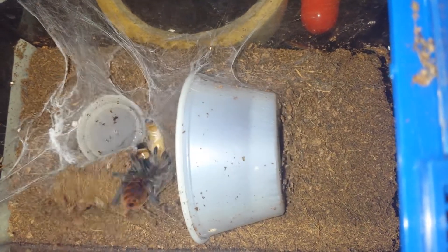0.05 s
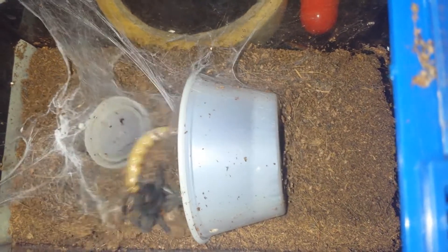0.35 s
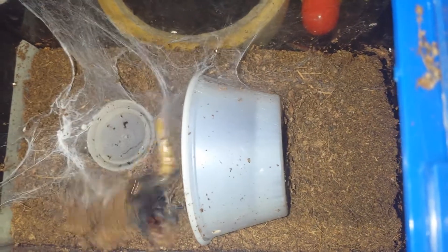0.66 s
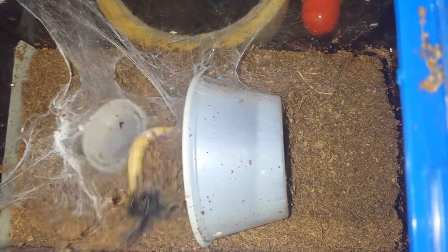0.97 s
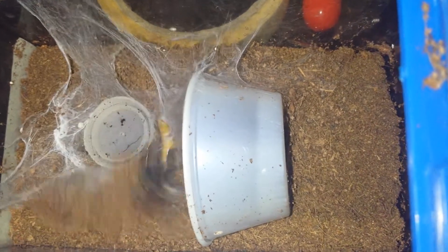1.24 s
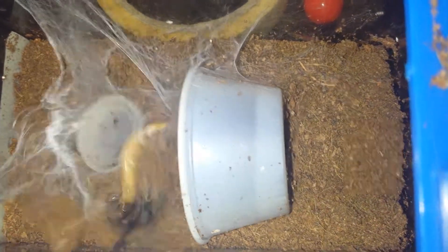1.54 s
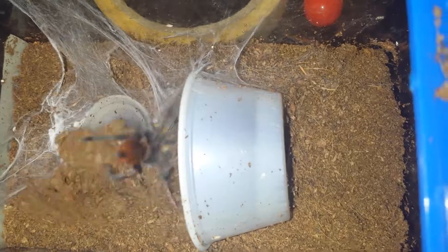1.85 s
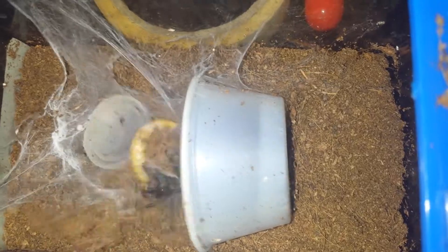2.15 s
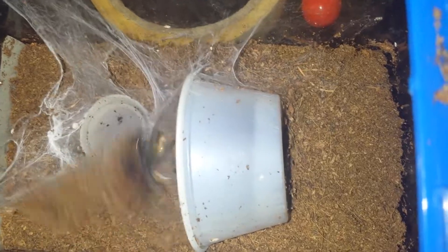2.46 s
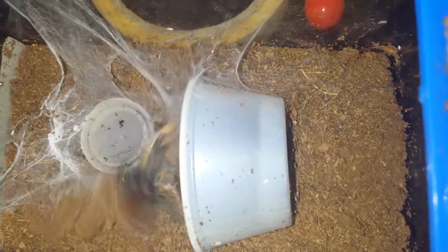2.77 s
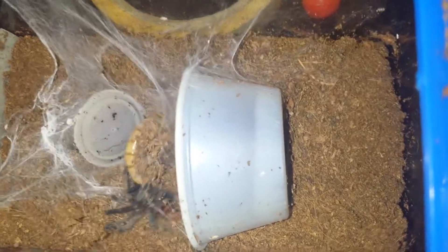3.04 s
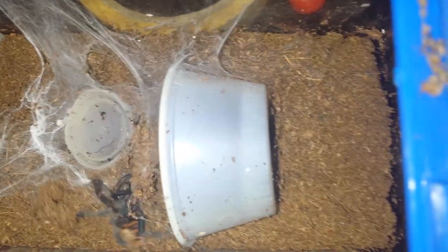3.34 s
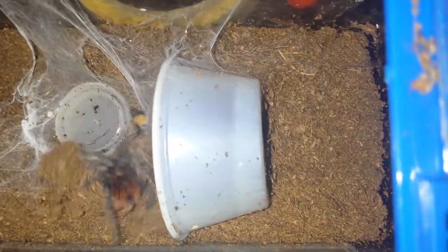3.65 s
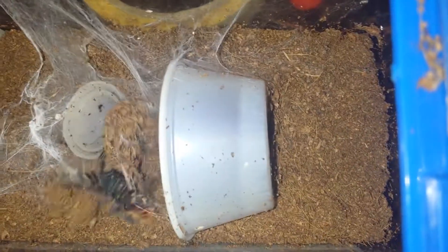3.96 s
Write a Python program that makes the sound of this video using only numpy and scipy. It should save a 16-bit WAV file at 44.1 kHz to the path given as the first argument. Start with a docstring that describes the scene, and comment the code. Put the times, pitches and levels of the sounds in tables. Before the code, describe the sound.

A spider and worm rustle softly in a plastic box, with a distant engine and hiss.

```python
"""Spider and worm in a plastic box

A spider and a worm thrash on dry soil and webbing in a small box, close to a phone.
Each stroke crushes many tiny grains, and legs and crumbs tick. The box is knocked, scraped
and rubbed, and there is one faint squeak. Behind them a low engine drone, probably a
vehicle outside, swells and sinks in pitch over a steady hiss."""
import sys
import numpy as np
from scipy import signal
from scipy.fft import rfft, irfft
from scipy.io import wavfile
from scipy.ndimage import uniform_filter1d

SR = 44100
rng = np.random.default_rng(int(sys.argv[2]) if len(sys.argv) > 2 else 0)


def generate_wav(sig):
    """Save sig (samples, or channels by samples) to the path in sys.argv[1] as 16-bit PCM at SR."""
    pcm = np.round(np.clip(np.atleast_2d(sig).T, -1, 1) * 32767).astype(np.int16)
    wavfile.write(sys.argv[1], SR, pcm)


N = 176400  # 4 seconds


def gain(db):
    """Turn decibels into a number to multiply by."""
    return 10 ** (np.asarray(db) / 20)


def normalise(x):
    """Scale a signal to an average power of 1."""
    return x / np.sqrt(np.mean(x ** 2))


def noise():
    """White noise: all pitches, equally strong."""
    return rng.standard_normal(N)


def wander(rate_hz):
    """A smooth random wobble, about 1 in size."""
    hold = int(SR / rate_hz)
    steps = np.repeat(rng.standard_normal(N // hold + 1), hold)
    return normalise(uniform_filter1d(uniform_filter1d(steps, hold), hold)[:N])


def colour(x, curve, size=8192):
    """Make some pitches louder and others softer, following (pitch_hz, level_db) points."""
    hz, db = np.array(curve, float).T
    freqs = np.maximum(np.arange(size // 2 + 1) * SR / size, 1)
    cepstrum = irfft(np.log(gain(np.interp(np.log(freqs), np.log(hz), db))))
    # fold the filter so that nothing sounds before the hit that causes it
    cepstrum[1:size // 2] *= 2
    cepstrum[size // 2 + 1:] = 0
    response = irfft(np.exp(rfft(cepstrum)))
    return signal.fftconvolve(x, response / np.linalg.norm(response))[:N]


def resonate(x, tones, size=4096):
    """Make a signal ring with tones that each fade by 60 dB in ring_s seconds."""
    t = np.arange(size) / SR
    response = sum(gain(db) * np.sin(2 * np.pi * hz * t) * np.exp(-np.log(1000) * t / ring_s)
                   for hz, ring_s, db in tones)
    return signal.fftconvolve(x, response / np.linalg.norm(response))[:N]


def hits(starts_s, levels_db, fade_s, tail, size=2048):
    """Each contact is one sharp click with a short, crumbling tail of noise."""
    out = np.zeros(N + size)
    clicks = rng.standard_normal((len(starts_s), size)) * tail * np.exp(-np.arange(size) / SR / fade_s)
    clicks[:, 0] = 1
    strength = np.sqrt(.005 * SR)  # as much energy as 5 ms of steady sound
    for start_s, db, click in zip(starts_s, levels_db, clicks):
        i = int(np.clip(start_s * SR, 0, N))
        out[i:i + size] += click / np.linalg.norm(click) * gain(db) * strength
    return out[:N]


def grains(per_s, spread_db):
    """Tiny clicks at random times, a few much louder than the rest."""
    sizes = gain(spread_db * np.minimum(rng.exponential(size=N), 5))
    return normalise((rng.random(N) < per_s / SR) * sizes * np.sign(noise()))


def left_delay(x, delay_s=.00015):
    """The left microphone hears the animals slightly later."""
    i = np.arange(len(x))
    return np.interp(i - delay_s * SR, i, x)


def wide_noise(curve, width):
    """Coloured noise, nearly the same left and right when width is small."""
    return colour(noise(), curve) + width * colour(noise(), curve) * np.array([[1], [-1]])


def add(out, start_s, sound):
    """Mix in a short stereo sound at start_s."""
    i = int(np.clip(start_s * SR, 0, N - 1))
    out[:, i:i + sound.shape[1]] += sound[:, :N - i]


# Tone colours of the room noise and the hiss: pitch_hz, level_db
ROOM_COLOUR = [(20, -23.5), (35, -15), (52, 6), (72, -5), (105, 2), (140, -8.5), (190, 0.5), (250, -12),
               (350, -9), (500, -15), (1000, -37.5), (3000, -41.5), (9000, -39)]
HISS_COLOUR = [(100, 11.5), (400, 7), (1000, 13), (1500, 5), (2200, 6), (3600, -2), (5000, 2), (5850, -10),
               (6500, 4.5), (7400, 4), (9000, -1.5), (14500, -2)]
# How the hiss drifts in loudness: time_s, level_db
HISS_LEVELS = [(0, -60), (.6, -54), (1.1, -56.5), (1.8, -54.5), (2.2, -57.5), (2.45, -58), (2.75, -60.5),
               (3.05, -59.5), (3.35, -61.5), (4, -60.5)]


def background(t):
    """Low room noise under a smooth hiss that is different on each side."""
    hiss = np.array([colour(noise(), HISS_COLOUR), gain(-1) * colour(noise(), HISS_COLOUR)])
    hiss_db = np.interp(t, *np.array(HISS_LEVELS).T) - 3.5
    return gain(-62) * wide_noise(ROOM_COLOUR, width=.078) + gain(hiss_db) * hiss


# The engine over time: time_s, firing_hz, tone_db, rumble_db
ENGINE_PATH = [(0, 125.9, -56, -60.5), (.3, 126, -57.5, -58), (.63, 126.6, -58.5, -58),
               (.86, 127.2, -50.5, -54), (1.299, 126.8, -49, -51), (1.5, 117, -49.5, -49),
               (1.66, 107.4, -49.5, -49), (1.685, 106.4, -40.5, -46), (1.755, 104.7, -40, -51),
               (1.79, 103.2, -42, -47), (1.85, 101.3, -41, -51.5), (1.912, 98.8, -45.5, -53.5),
               (1.945, 97.7, -62.5, -58), (2.08, 96.8, -56, -55.5), (2.349, 93.3, -77, -61),
               (3.2, 90.6, -78, -71), (4, 90, -65.5, -60)]
# Its weaker tones, which follow the rumble's level: times_firing_rate, level_db
ENGINE_TONES = [(.6, -8), (1.4, -12), (1.6, -8.5), (1.8, -10), (2, -15), (3.001, -21.5)]
# Tone colour of the rumble: pitch_hz, level_db
RUMBLE_COLOUR = [(20, -49.5), (45, -3), (62, -4), (78, 7.5), (115, 6.5), (150, -14), (192, 2.5),
                 (235, -15.5), (270, -10), (330, -5), (480, -19), (1000, -25), (2500, -35.5), (8000, -34.5)]


def engine(t):
    """An engine's firing makes a muffled drone, which sinks in pitch as it goes by."""
    time_s, firing_hz, tone_db, rumble_db = np.array(ENGINE_PATH).T
    pitch_hz = np.interp(t, time_s, firing_hz) * (1 + .0047 * wander(20.4))
    phase = 2 * np.pi * np.cumsum(pitch_hz) / SR
    drone = np.sqrt(2) * np.sin(phase) * gain(np.interp(t, time_s, tone_db) + 2 * wander(24.13))
    weak_tones = sum(
        np.sqrt(2) * gain(db + 1.3 * wander(12)) * np.sin(multiple * phase + 2 * np.pi * rng.random())
        for multiple, db in ENGINE_TONES)
    rumble = gain(-.5) * wide_noise(RUMBLE_COLOUR, width=.32)
    return drone + gain(np.interp(t, time_s, rumble_db)) * (weak_tones + rumble)


def squeak(t, peak_s=1.733, rise_s=.021, fall_s=.097, pitch_hz=1547):
    """One faint, rough squeak on the left that swells quickly and fades."""
    phase = 2 * np.pi * np.cumsum(pitch_hz * (1 + .05 * wander(400))) / SR
    swell = np.exp(-((t - peak_s) / np.where(t < peak_s, rise_s, fall_s)) ** 2 / 2)
    rough_level = gain(-61.5 + 3 * wander(250))
    left_right = gain([[0], [-12]])
    return left_right * swell * rough_level * np.sqrt(2) * np.sin(phase)


# Bodies rubbing along the plastic: peak_s, half_length_s, level_db
WALL_RUBS = [(0.286, 0.014, -61), (1.576, .007, -50), (1.639, 0.0067, -55.5), (2.83, 0.015, -68.5),
             (2.926, 0.043, -64), (3.127, .025, -71), (3.192, .02, -64.5), (3.468, 0.027, -69)]
# Tones that rubbing sets ringing: pitch_hz, ring_s, level_db
RUB_TONES = [(2070, 0.023, -2), (2185, 0.017, -4.5), (5830, 0.017, 0.5), (7500, 0.0079, 3)]


def rubs(t):
    """A body sliding along the wall catches in tiny steps that ring the plastic."""
    pressure = sum(gain(db) * np.exp(-((t - peak_s) / half_length_s) ** 2 / 2)
                   for peak_s, half_length_s, db in WALL_RUBS)
    return np.array([resonate(pressure * grains(per_s=2300, spread_db=2), RUB_TONES) for _ in range(2)])


# Soft knocks on the box: start_s, level_db, left_minus_right_db, pitch_hz
BOX_KNOCKS = [(.427, -55, 1, 480), (.447, -58.5, 3, 351.2), (1.335, -51, 15, 149), (1.412, -43.5, 4, 151),
              (1.426, -46.5, 2, 165), (1.44, -48, 5, 160), (1.51, -49, 3, 100), (1.574, -45.5, -6.5, 183),
              (1.616, -45, -1, 152), (1.661, -53.5, 1, 189), (1.713, -57, -2, 350), (2.064, -46.5, 1, 104),
              (2.974, -56, -4, 200), (3.033, -60.5, 22, 300), (3.504, -50, -3.5, 211),
              (3.513, -55.5, -3, 190.3), (3.597, -55.5, 18, 201), (3.624, -57.5, 21.5, 245),
              (3.636, -53, 21, 177)]
# Tone colour of a knock, strongest at 190 Hz: pitch_hz, level_db
KNOCK_COLOUR = [(30, -54), (70, -11), (120, 4.5), (190, 10.5), (300, -0.5), (520, -10.5), (800, -18),
                (2200, -28), (4000, -37), (12000, -42)]


def knocks():
    """Each bump on the box makes a dull thud with its own pitch."""
    out = np.zeros((2, N))
    for start_s, level_db, pan_db, pitch_hz in BOX_KNOCKS:
        bump = hits([0], [level_db + 4.5], fade_s=.0096, tail=.056)[:2048]
        thud = colour(bump, [(hz * pitch_hz / 190, db) for hz, db in KNOCK_COLOUR])
        add(out, start_s, gain([[pan_db / 2], [-pan_db / 2]]) * thud)
    return out


# Hard scrapes against the plastic: start_s, crack_db, ring_db
BOX_SCRAPES = [(0.428, -73, -53), (.735, -59, -68), (.989, -59, -51), (1.0522, -65, -70),
               (1.0755, -52.5, -57), (1.3024, -57.5, -67), (1.337, -59.5, -62), (1.5435, -44, -53),
               (1.5484, -57, -57), (1.5745, -46.5, -42.5), (2.9436, -54, -69), (3.135, -70, -59),
               (3.596, -62, -69), (3.625, -62, -64), (3.8062, -56.5, -73)]
# Tone colour of the crack: pitch_hz, level_db
CRACK_COLOUR = [(150, -4), (480, 4), (900, 19), (1500, 11.5), (2100, 18.5), (2500, 13), (3200, -16),
                (5000, -7), (12000, -8)]
# The box's own hollow tones: pitch_hz, ring_s, level_db
BOX_TONES = [(309, 0.28, -8), (380, .05, -10), (650, 0.06, 3), (940, 0.048, -7.5), (1520, 0.054, -8),
             (1910, 0.038, -8), (2170, 0.059, -5)]


def scrapes():
    """A hard scrape starts with a crack and sets the plastic box ringing."""
    start_s, crack_db, ring_db = np.array(BOX_SCRAPES).T
    cracks = [colour(hits(start_s, crack_db, fade_s=.0039, tail=.56), CRACK_COLOUR) for _ in range(2)]
    hollow_ring = resonate(hits(start_s, ring_db, fade_s=.012, tail=.041), BOX_TONES)
    return np.array(cracks) + hollow_ring


# Tones of the phone's microphone port, the small hole that lets sound in: pitch_hz, ring_s, level_db
PORT_TONES = [(4810, 0.014, -4), (5740, 0.02, 1.5), (5866, 0.028, 0.5), (6680, 0.0061, 0),
              (7530, 0.0066, -11)]
PORT_HZ = 5850


def port_ring(x, pitch_hz=PORT_HZ):
    """Each tick sets the phone's microphone port ringing briefly near 6 kHz, louder on the right."""
    ring = resonate(x, [(hz * pitch_hz / PORT_HZ, ring_s, db) for hz, ring_s, db in PORT_TONES])
    return np.array([gain(-5) * left_delay(ring), ring])


# Ticks of legs and crumbs: start_s, level_db, snap_above_level_db, port_pitch_hz
LEG_AND_CRUMB_TICKS = [(0.119, -51, -9, 5800), (.388, -58, 6, 5850), (0.442, -52, -11, 5750),
                       (.5373, -56, -10, 5900), (0.6948, -42, -6, 5750), (0.7343, -38, -9, 5960),
                       (.745, -47.5, -5, 5800), (0.934, -51, 5, 6100), (1.0522, -35.5, -7, 5830),
                       (1.0589, -42, -7, 5960), (1.068, -38.5, -6, 5900), (1.0762, -34, -6.5, 5830),
                       (1.1354, -46.5, -13, 5800), (1.3029, -37, -8, 5840), (1.5436, -33.5, 1.5, 5900),
                       (1.619, -33.5, -6, 6020), (1.636, -42, -5, 5700), (1.6796, -55, -17, 5800),
                       (1.6931, -42, -12, 5700), (1.754, -55, 11, 5850), (1.757, -57, 10, 5850),
                       (1.847, -50, 4, 5857), (1.8553, -37.5, -6, 5780), (1.945, -54, 4, 5740),
                       (1.9991, -44.5, -12, 5686), (2.0199, -45, -9, 5830), (2.036, -41.5, 0, 5790),
                       (2.069, -46, -4, 5800), (2.153, -41.5, 1, 5860), (2.2064, -49, 0, 5800),
                       (2.3344, -59.5, 13.5, 5900), (2.4934, -60, -11, 5850), (2.5067, -46, -3.5, 5874),
                       (2.5104, -48, -6, 5730), (2.8217, -53, -6, 5850), (2.9084, -51, 4, 5700),
                       (2.923, -49, -4, 5900), (2.9445, -38.5, -2, 5840), (3.0823, -44.5, 2.5, 5920),
                       (3.132, -55.5, 1, 5900), (3.6785, -64, 12, 5970), (3.7382, -53, -9, 5850),
                       (3.8066, -34, -2.5, 5880), (3.888, -56, -8, 5870), (3.901, -55, -15, 5850),
                       (3.912, -48.5, -4, 5800), (3.928, -58, -14, 5720)]
# Tone colour of a tick's snap: pitch_hz, level_db
SNAP_COLOUR = [(300, -35), (2000, -1), (3300, -17), (4600, 2), (7500, 16.5), (9000, 6.5), (11000, 7),
               (14500, -1.5)]


def ticks(volume_db=-3.5):
    """Legs and crumbs tick, ringing the microphone port; a bright snap reaches only the right side."""
    starts_s, levels_db, snaps_db, _ = np.array(LEG_AND_CRUMB_TICKS).T
    snaps = hits(starts_s, levels_db + snaps_db + volume_db, fade_s=.0012, tail=.66)
    out = np.array([np.zeros(N), colour(snaps, SNAP_COLOUR)])
    for start_s, level_db, _, port_pitch_hz in LEG_AND_CRUMB_TICKS:
        contact = hits([0], [level_db + volume_db], fade_s=.0007, tail=.12)[:2048]
        add(out, start_s, port_ring(contact, port_pitch_hz))
    return out


# The animals' strokes through the soil: peak_s, rise_s, fall_s, level_db
SOIL_STROKES = [(0.028, 0.13, 0.045, -51), (.32, 0.058, 0.041, -46.5), (.43, 0.042, 0.032, -52),
                (.56, 0.11, 0.17, -60), (0.75, 0.024, 0.028, -51), (.98, 0.038, 0.1, -48),
                (1.15, 0.038, 0.069, -52.5), (1.32, 0.076, 0.067, -53), (1.546, 0.0063, 0.019, -40),
                (1.577, 0.013, 0.01, -43), (1.6, 0.059, 0.068, -46), (1.76, 0.01, 0.058, -54),
                (1.845, 0.052, 0.056, -48), (2.045, 0.027, 0.036, -50), (2.15, 0.032, 0.041, -47),
                (2.22, 0.021, 0.069, -53), (2.41, 0.021, 0.04, -58), (.17, 0.063, 0.091, -53),
                (.85, 0.048, 0.1, -57.5), (2.5, 0.021, 0.1, -58), (2.859, 0.06, 0.026, -54.5),
                (2.958, 0.036, 0.026, -45.5), (3.14, 0.05, 0.061, -55.5), (3.21, 0.051, 0.098, -62),
                (3.48, 0.047, 0.025, -53), (3.69, 0.11, 0.062, -59), (3.831, 0.062, 0.035, -56.5),
                (3.951, 0.03, 0.13, -56.5)]
# Tone colour of the soil on each side: pitch_hz, level_db
SOIL_LEFT_COLOUR = [(200, 0), (1000, 5.5), (2100, 8), (3500, 1), (5200, 6), (5850, 10.5), (6400, 0),
                    (7000, -4), (8200, -10), (9500, -9), (14500, -11.5)]
SOIL_RIGHT_COLOUR = [(200, 1), (1000, -10), (2200, -3.5), (3400, -8.5), (4900, -5), (5500, -12.5),
                     (5850, 8), (6250, -2), (7100, 6), (7800, 2.5), (9000, -3.5), (14500, -2.5)]


def soil(t):
    """Each stroke swells and fades, crushing fine grains and flicking larger crumbs."""
    power = sum(
        gain(db) ** 2 * np.exp(-np.abs((t - peak_s) / np.where(t < peak_s, rise_s, fall_s)) ** 1.63)
        for peak_s, rise_s, fall_s, db in SOIL_STROKES)
    effort = np.sqrt(power) * gain(2.5 * wander(60))  # the level flutters quickly
    direct, scattered = (effort * grains(per_s=16000, spread_db=4) for _ in range(2))
    left = gain(-9) * colour(.37 * left_delay(direct) + .92 * scattered, SOIL_LEFT_COLOUR)
    right = colour(direct, SOIL_RIGHT_COLOUR)
    crumbs = port_ring(effort * grains(per_s=300, spread_db=2))
    return np.array([left, right]) + gain(-10) * crumbs


def scene():
    """The scuffle in its box, with the engine and the background behind it."""
    t = np.arange(N) / SR
    scuffle = soil(t) + ticks() + knocks() + scrapes() + rubs(t) + squeak(t)
    return scuffle + engine(t) + background(t)


def record(dry, top_hz=14600):
    """The phone steeply cuts off the very highest pitches."""
    return signal.sosfilt(signal.ellip(10, .2, 70, top_hz, fs=SR, output="sos"), dry)


dry = scene()
out = record(dry)
generate_wav(out)
```